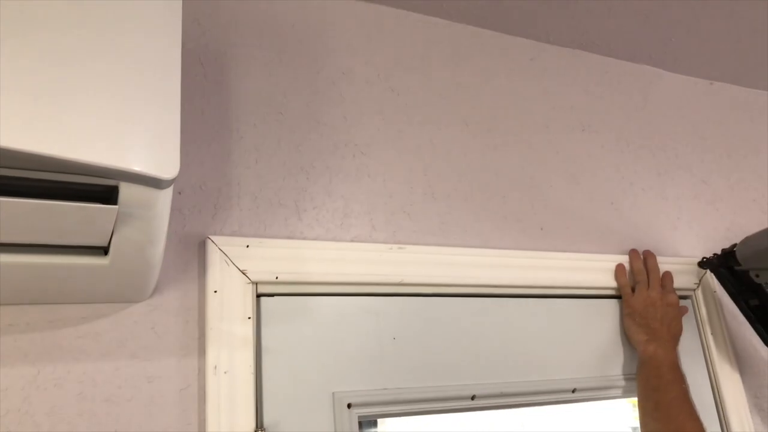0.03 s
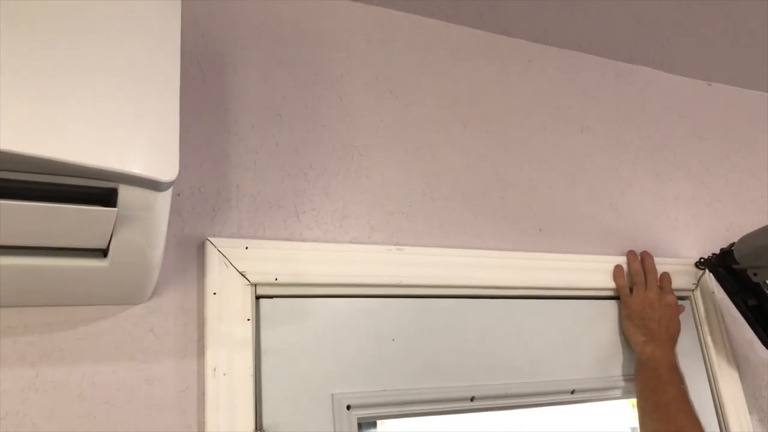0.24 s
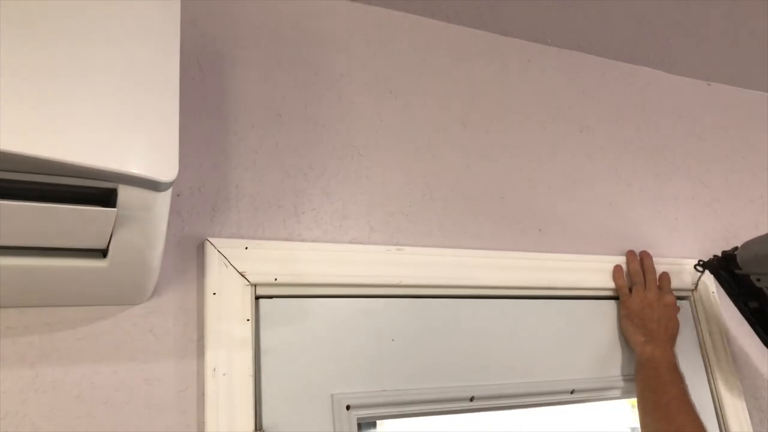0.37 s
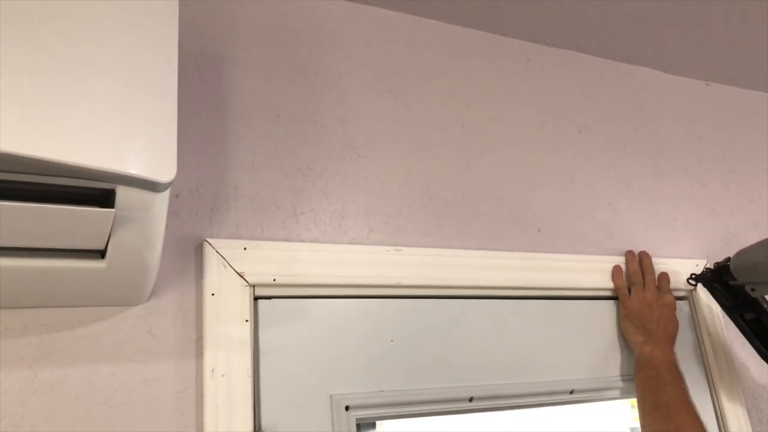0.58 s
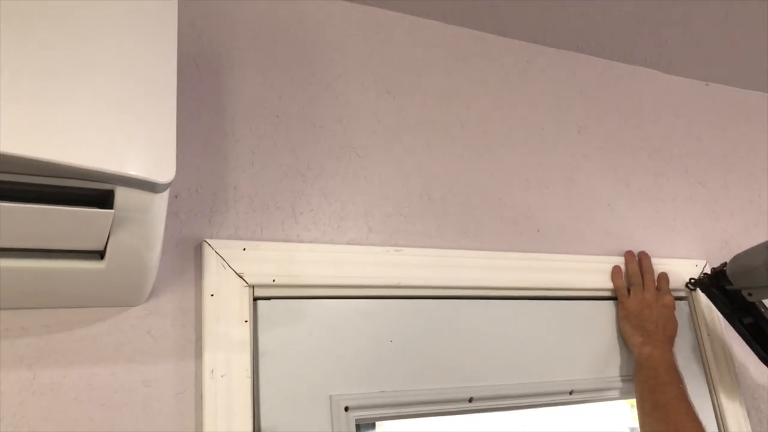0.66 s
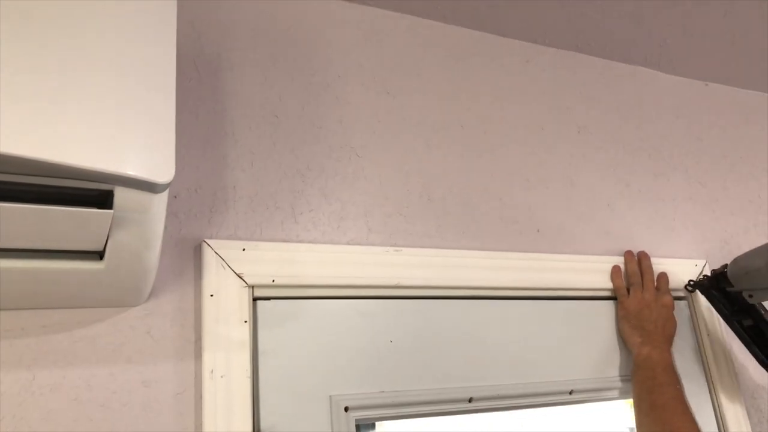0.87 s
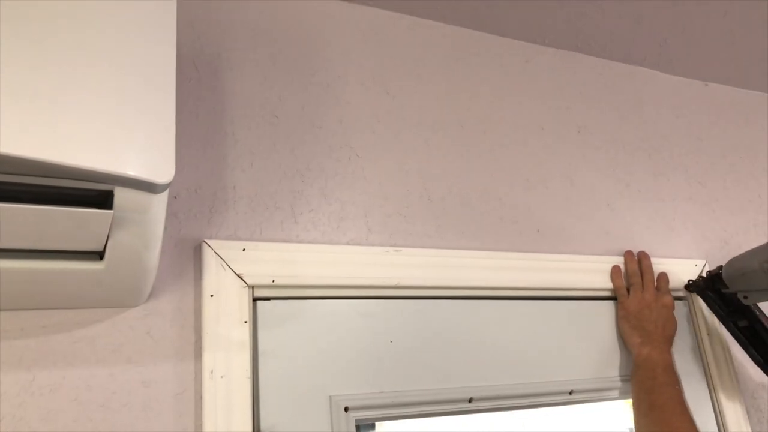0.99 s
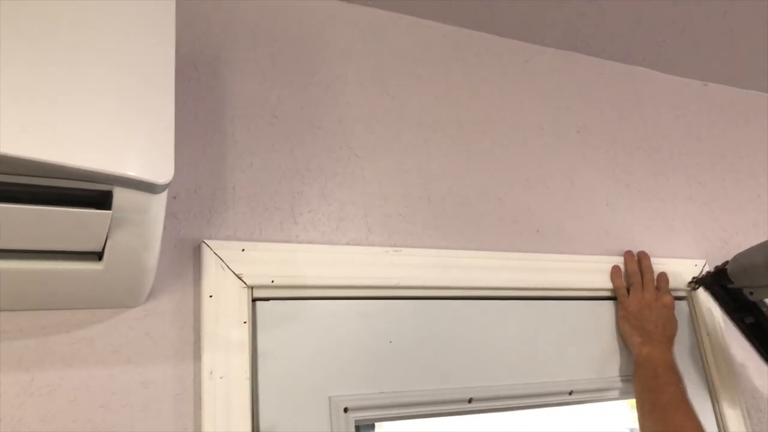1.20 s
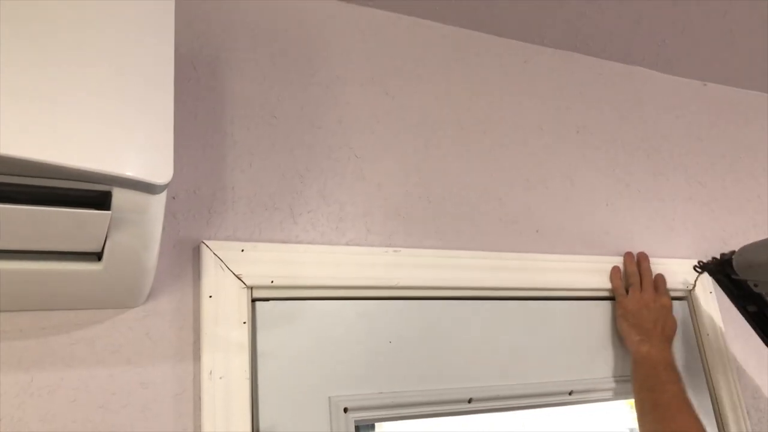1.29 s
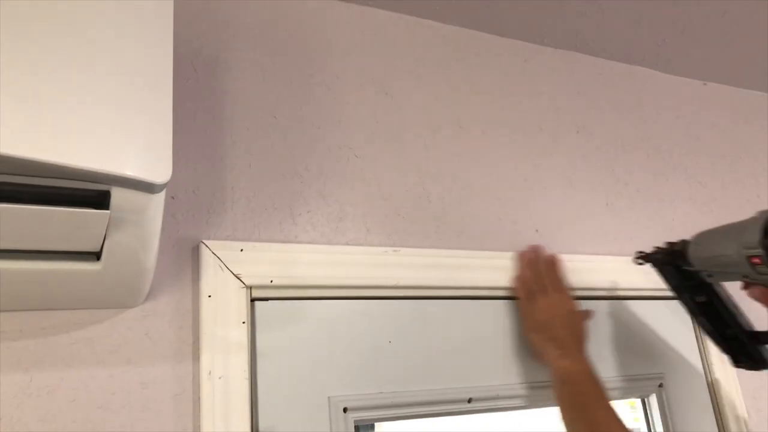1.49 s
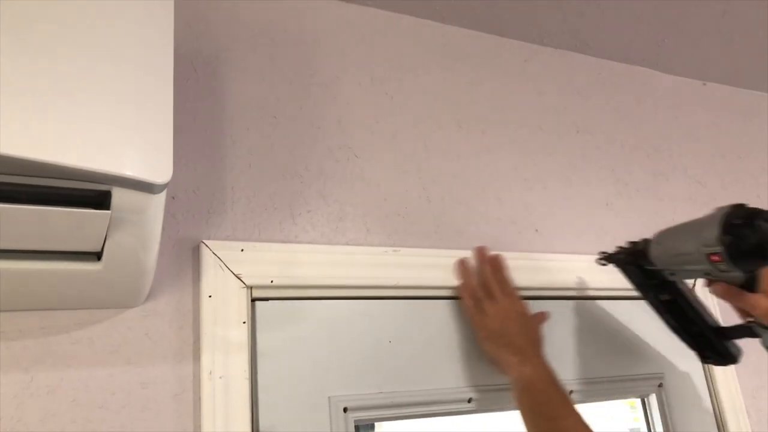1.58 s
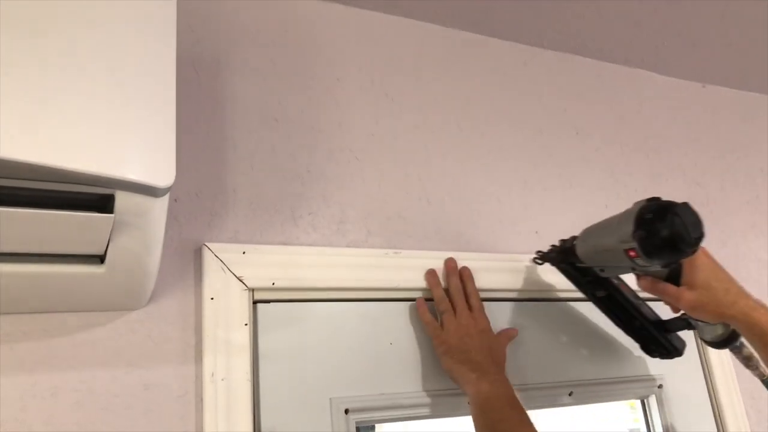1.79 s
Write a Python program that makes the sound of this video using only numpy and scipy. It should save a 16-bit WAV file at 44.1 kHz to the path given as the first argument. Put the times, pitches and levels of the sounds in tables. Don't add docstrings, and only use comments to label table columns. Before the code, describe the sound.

Pneumatic nail gun fires twice into wooden door trim, sharp cracks with bright air bursts, ringing room

```python
import sys
import numpy as np
from scipy import signal
from scipy.fft import rfft, irfft
from scipy.io import wavfile

SR = 44100
rng = np.random.default_rng(int(sys.argv[2]) if len(sys.argv) > 2 else 0)


def bounce(signal):
    frames = np.transpose(np.atleast_2d(signal))
    limited = np.clip(frames, -1, 1)
    pcm = np.round(limited * 32767).astype(np.int16)
    wavfile.write(sys.argv[1], SR, pcm)


def voltage_ratio(decibels):
    exponent = np.asarray(decibels, float) / 20
    return 10 ** exponent


N = 81585
HALF_S = SR // 2

# f/Hz, density/dB
FLOOR_SPECTRUM = [(30, -15), (90, -13), (160, -16), (1500, -6.5), (3000, -15.5), (6000, -29.5),
                  (16000, -47)]
# f/Hz, t60/s
ROOM_T60 = [(100, 0.65), (300, 1.26), (600, 1.146), (1100, 1.96), (5500, 1.59), (8500, 1.036),
            (12000, 0.49), (15500, 0.37)]
# f/Hz, density/dB
ROOM_COLOUR = [(60, 5.5), (150, -5), (400, 5), (1000, 0.5), (2000, -2), (5000, -2), (9000, -9),
               (15000, -29)]
# f/Hz, density/dB
EARLIER_COLOUR = [(60, -8), (300, 4.5), (1000, -3), (2300, 1), (3200, -32), (6000, -2), (15000, -14)]
# t/s, level/dB, t60/s
CLICKS = [
    (.1902, -13, .016),
    (.1992, -29, .012),
    (.2016, -25, .012),
    (1.0062, -21, .03),
    (1.0118, -12, .014),
    (1.1225, -28, .012),
    (1.128, -26, .012),
]
# f/Hz, level/dB, t60/s
METAL_MODES = [(1800, -4, .007), (3600, 1, .009), (4200, -1, .007), (7100, -7, .005), (9600, -10, .004),
               (11500, -13, .003)]
# t/s, level/dB, attack/s, damping t60/s
THUMPS = [
    (0.212, -22, 0.0037, 0.24),
    (0.298, -9, 0.016, 0.67),
    (1.0285, -18, 0.0017, 0.6),
    (1.134, -23, 0.0017, 0.11),
    (1.216, -7.5, 0.037, 0.38),
]
# f/Hz, level/dB, t60/s
WALL_MODES = [(64, -7, 0.63), (96.4, -1, 0.75), (141, 12.5, 0.05), (249, -9, 0.062)]
# t/s, level/dB
BURSTS = [
    (.2985, 5),
    (1.2165, -3),
]
BURST_ROOM_DB = [-4.5, -8]
# f/Hz, density/dB
JET_SPECTRUM = [(300, -34), (2000, -7), (5000, 4), (7500, 7.5), (11000, 0), (16000, -1)]
# f/Hz, density/dB
JET_ROOM_COLOUR = [(300, -6), (2000, -10.5), (4000, -3.5), (6200, 5.5), (9000, 3), (15000, 3)]
# delay/s, level/dB
ECHOES = [(.031, -1), (0.044, -2), (.054, 3.5), (0.069, -9), (.078, -24)]
# t/s, level/dB, room level/dB
SHOTS = [
    (0.2126, -6, -2),
    (1.134, -9.5, -6.5),
]
# delay/s, level/dB, t60/s, low-pass f/Hz
BLOWS = [
    (0, 2, .018, 3500),
    (.0100, 3, .022, 6000),
    (.0265, -4, .02, 6000),
]
# f/Hz, level/dB, t60/s
BODY_MODES = [(270, -24, .02), (950, -15, .02), (1550, -3, .008), (2600, -1, .005), (4000, 0, .005),
              (6500, -5, .004)]

FLOOR_DB = -34.5
ROOM_DELAY_S, ROOM_BUILD_S, ROOM_EARLY_DB = 0.025, 0.022, -13
EARLIER_AGE_S, EARLIER_DB = 1.366, 13
SLIDE_S, SLIDE_LENGTH_S, SLIDE_DB, SLIDE_HZ, SLIDE_WIDTH_HZ = 0.95, 0.19, -31.5, 826, 120
SCRATCH_DB, METAL_DB = -10, -10
CLICK_TAIL_DB, CLICK_TAIL_T60_S = -18, 0.71
PANEL_RATTLE_DB = -9.5
JET_ATTACK_S, JET_T60_S, JET_BUILD_S = 0.0013, 0.13, 0.033
WHISTLE_HZ, WHISTLE_WIDTH_HZ, WHISTLE_DB = 6090, 320, -7.5
ECHO_T60_S, ECHO_HZ, ECHO_WIDTH_HZ, ECHO_RING_DB = 0.042, 950, 150, 13.5
BODY_DB, CRACK_DB, CRACK_LOW_HZ = -13.5, 10.5, 500
MODE_LUCK_DB = 2.5
MIC_LOW_HZ, MIC_HIGH_HZ = 51, 16600
LIMIT_DB, RELEASE_DB_PER_S, SQUEEZE = -7.5, 194, 0.9
SENSE_S, ATTACK_S = 0.006, 0.004


def at_hz(points, hz):
    table = np.array(points)
    return np.interp(np.log(hz), np.log(table[:, 0]), table[:, 1])


def rms_one(x):
    return x / np.sqrt(np.mean(x ** 2) + 1e-20)


def coloured(spectrum, size):
    hz = np.maximum(np.fft.rfftfreq(size, 1 / SR), 10)
    gain = voltage_ratio(at_hz(spectrum, hz)) * (hz > 20)
    return rms_one(irfft(rfft(rng.standard_normal(size)) * gain, size))


def band_pass(x, order, low_hz, high_hz):
    return signal.sosfilt(signal.butter(order, [low_hz, high_hz], "band", fs=SR, output="sos"), x)


def band_noise(hz, width_hz, size):
    b, a = signal.iirpeak(hz, hz / width_hz, fs=SR)
    return rms_one(signal.lfilter(b, a, rng.standard_normal(size)))


def fade(t60_s, attack_s=0.0001):
    t = np.arange(HALF_S) / SR
    return (1 - np.exp(-t / attack_s)) * voltage_ratio(-60 * t / t60_s)


def rings(strike, modes):
    out = 0
    lucks_db = rng.normal(0, MODE_LUCK_DB, len(modes))
    for (hz, db, t60_s), luck_db in zip(modes, lucks_db):
        r = voltage_ratio(-60 / (t60_s * SR))
        w = 2 * np.pi * hz / SR
        b = [0, voltage_ratio(db + luck_db) * np.sin(w)]
        a = [1, -2 * r * np.cos(w), r * r]
        out = out + signal.lfilter(b, a, strike + 1e-18)
    return out


def smooth(x, time_s):
    r = np.exp(-1 / (time_s * SR))
    return signal.lfilter([1 - r], [1, -r], x)


def add(track, s, sound):
    i = int(s * SR)
    track[i:i + len(sound)] += sound[:len(track) - i]


def room(colour, age_s, delay_s, build_s):
    t = age_s + np.arange(N) / SR
    white = rng.standard_normal((2, N))
    edges_hz = np.geomspace(45, 16500, 31)
    tail, power = 0, 0
    for k, (low, high) in enumerate(zip(edges_hz, edges_hz[1:])):
        hz = np.sqrt(low * high)
        band = voltage_ratio(at_hz(colour, hz)) * band_pass(white[k % 2], 2, low, high)
        tail = tail + band * voltage_ratio(-60 * t / at_hz(ROOM_T60, hz))
        power = power + np.mean(band ** 2)
    early = voltage_ratio(ROOM_EARLY_DB) * (1 - np.exp(-t / 0.0013))
    late = 1 - np.exp(-np.maximum(t - delay_s, 0) / build_s)
    return tail / np.sqrt(power) * np.maximum(early, late)


def still_air():
    return voltage_ratio(FLOOR_DB) * coloured(FLOOR_SPECTRUM, N)


def earlier_shot():
    return voltage_ratio(EARLIER_DB) * room(EARLIER_COLOUR, EARLIER_AGE_S, 0, ROOM_BUILD_S)


def slide():
    out = np.zeros(N)
    size = int(SLIDE_LENGTH_S * SR)
    scrape = band_noise(SLIDE_HZ, SLIDE_WIDTH_HZ, SR)[:size]
    add(out, SLIDE_S, voltage_ratio(SLIDE_DB) * np.hanning(size) ** 0.5 * scrape)
    return out


def clicks():
    out = np.zeros(N)
    for s, db, t60_s in CLICKS:
        scratch = rng.standard_normal(HALF_S) * fade(t60_s, 0.0016)
        metal = voltage_ratio(METAL_DB) * rings(scratch, METAL_MODES)
        wash = voltage_ratio(CLICK_TAIL_DB) * coloured(ROOM_COLOUR, HALF_S) * fade(CLICK_TAIL_T60_S, 0.0089)
        add(out, s, voltage_ratio(db) * (voltage_ratio(SCRATCH_DB) * scratch + metal + wash))
    return out


def wall():
    out = np.zeros(N)
    for s, db, attack_s, t60_s in THUMPS:
        push = voltage_ratio(PANEL_RATTLE_DB) * rng.standard_normal(HALF_S) * fade(0.7) / 60
        push[0] += 1
        boom = rings(push, WALL_MODES) * fade(t60_s, attack_s)
        add(out, s, voltage_ratio(db) * boom * np.hanning(SR)[HALF_S:])
    return out


def exhaust():
    out = np.zeros(N)
    for (s, db), room_db in zip(BURSTS, BURST_ROOM_DB):
        whistle = band_noise(WHISTLE_HZ, WHISTLE_WIDTH_HZ, HALF_S)
        jet = coloured(JET_SPECTRUM, HALF_S) + voltage_ratio(WHISTLE_DB) * whistle
        add(out, s, voltage_ratio(db) * jet * fade(JET_T60_S, JET_ATTACK_S))
        add(out, s, voltage_ratio(room_db) * room(JET_ROOM_COLOUR, 0, 0, JET_BUILD_S))
    return out


def echoes():
    out = np.zeros(N)
    for s, db, _ in SHOTS:
        for delay_s, echo_db in ECHOES:
            ring = voltage_ratio(ECHO_RING_DB) * band_noise(ECHO_HZ, ECHO_WIDTH_HZ, HALF_S) / 4
            noise = coloured(ROOM_COLOUR, HALF_S) + ring
            add(out, s + delay_s, voltage_ratio(db + echo_db) * noise * fade(ECHO_T60_S, 0.00086))
    return out


def driver():
    out = np.zeros(N)
    for s, db, room_db in SHOTS:
        add(out, s, voltage_ratio(room_db) * room(ROOM_COLOUR, 0, ROOM_DELAY_S, ROOM_BUILD_S))
        for delay_s, part_db, t60_s, high_hz in BLOWS:
            crack = band_pass(rng.standard_normal(HALF_S), 1, CRACK_LOW_HZ, high_hz) * fade(t60_s)
            body = rings(crack, BODY_MODES)
            add(out, s + delay_s, voltage_ratio(db + part_db) * (voltage_ratio(CRACK_DB) * crack + voltage_ratio(BODY_DB) * body))
    return out


def scene():
    background = still_air() + earlier_shot()
    mono = background + slide() + clicks() + wall() + exhaust() + echoes() + driver()
    return np.array([mono, mono])


def band_limit(x):
    return signal.sosfilt(signal.butter(12, 16330, fs=SR, output="sos"), x)


def record(dry):
    dry = signal.sosfilt(signal.butter(2, MIC_LOW_HZ, "high", fs=SR, output="sos"), dry)
    level_db = 10 * np.log10(smooth(dry[0] ** 2, SENSE_S) + 1e-12)
    ramp_db = RELEASE_DB_PER_S * np.arange(N) / SR
    held_db = np.maximum.accumulate(level_db + ramp_db) - ramp_db
    over_db = np.maximum(held_db - LIMIT_DB, 0)
    limited = dry * voltage_ratio(-SQUEEZE * smooth(over_db, ATTACK_S))
    clipped = np.clip(limited, -0.9, 0.9)
    mix = signal.sosfilt(signal.cheby2(12, 60, MIC_HIGH_HZ, fs=SR, output="sos"), clipped)
    return band_limit(mix)


dry = scene()
out = record(dry)
bounce(out)
```